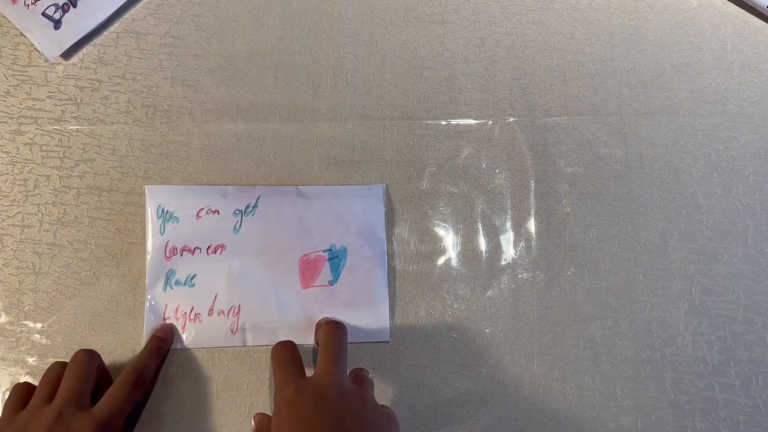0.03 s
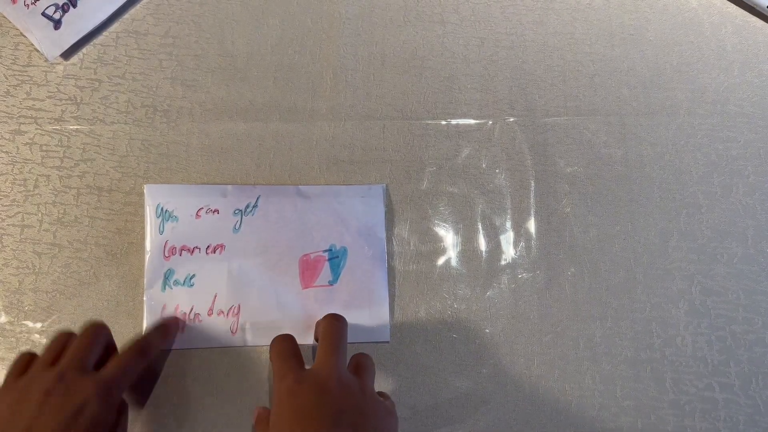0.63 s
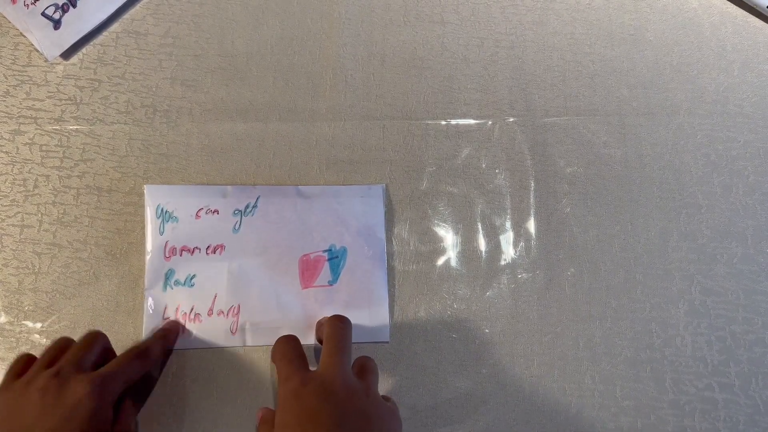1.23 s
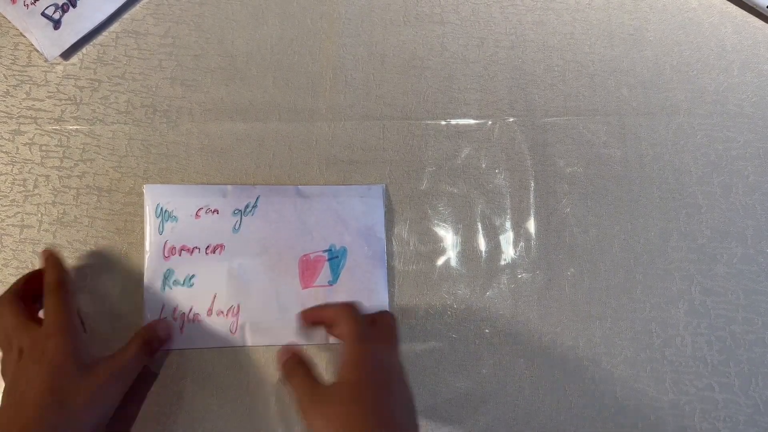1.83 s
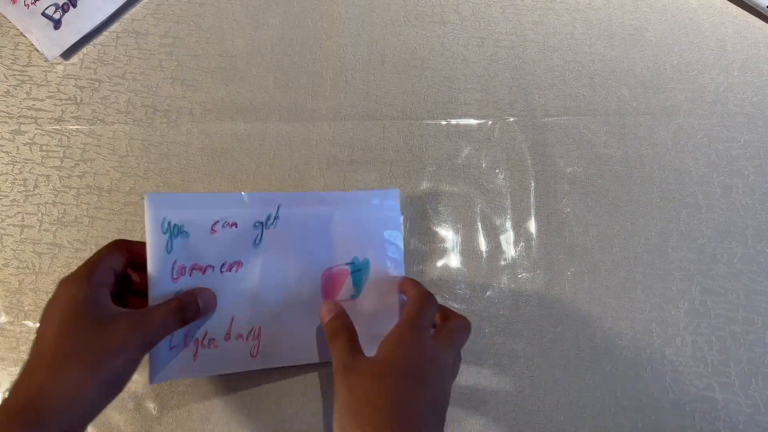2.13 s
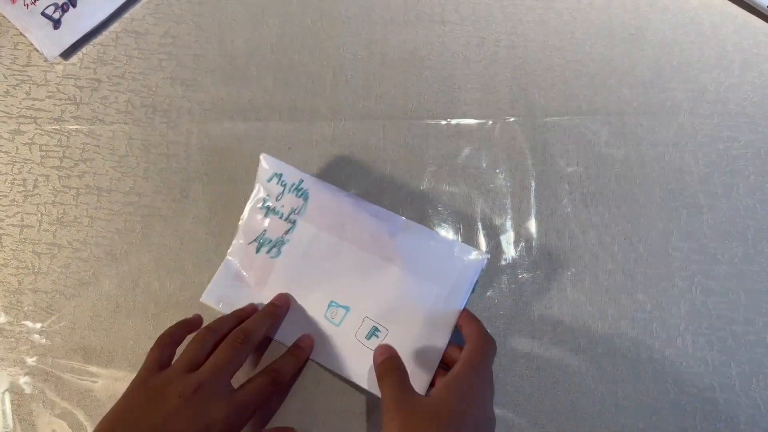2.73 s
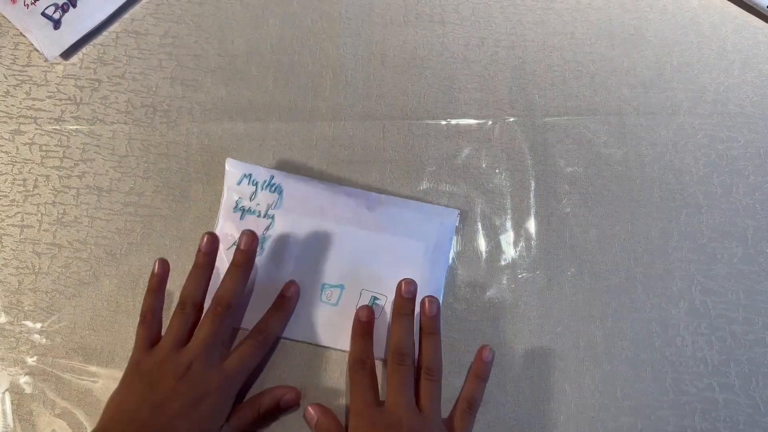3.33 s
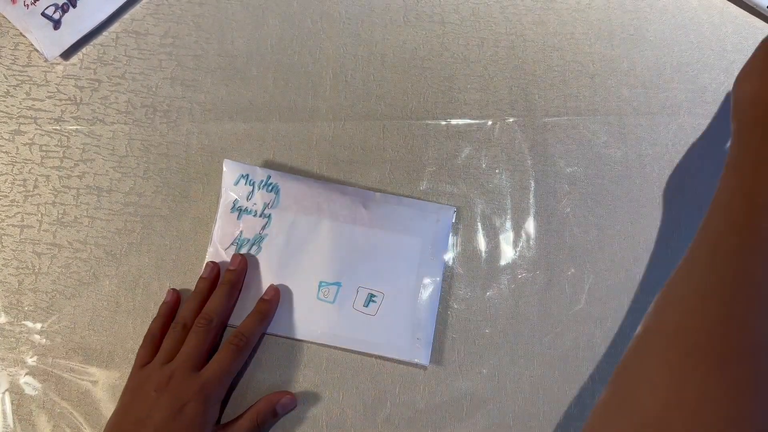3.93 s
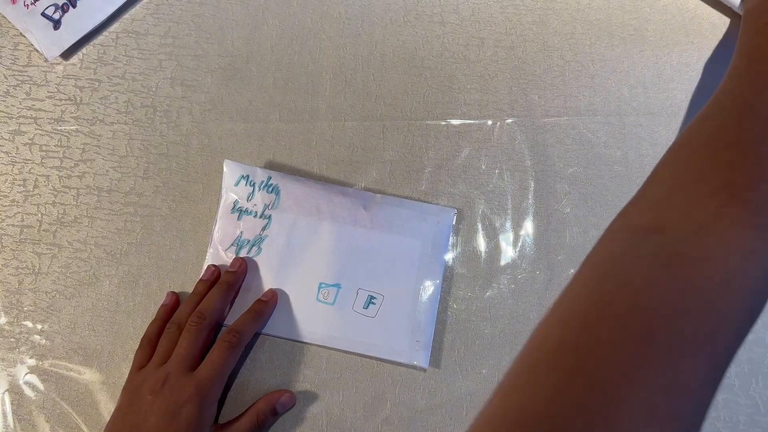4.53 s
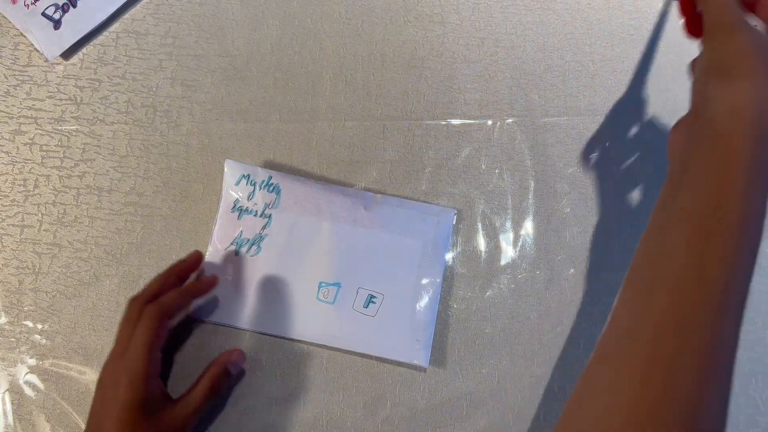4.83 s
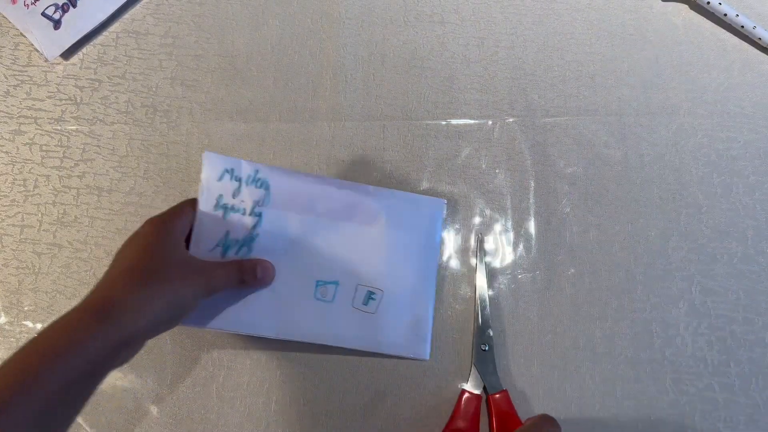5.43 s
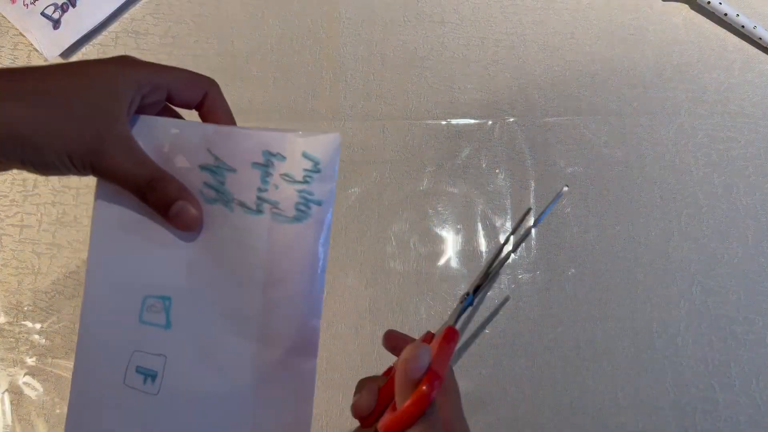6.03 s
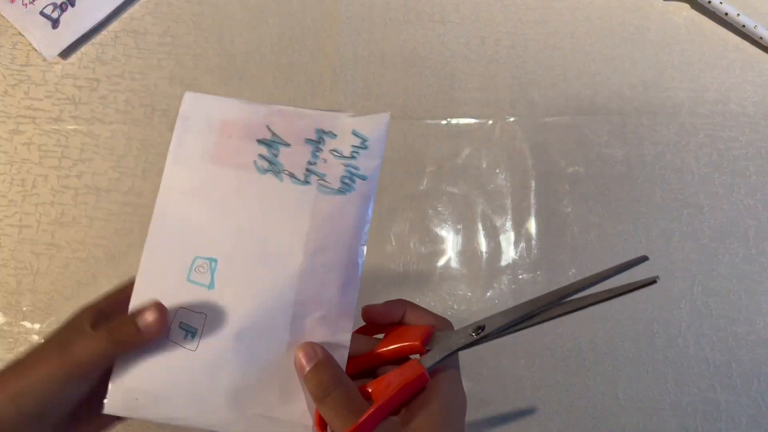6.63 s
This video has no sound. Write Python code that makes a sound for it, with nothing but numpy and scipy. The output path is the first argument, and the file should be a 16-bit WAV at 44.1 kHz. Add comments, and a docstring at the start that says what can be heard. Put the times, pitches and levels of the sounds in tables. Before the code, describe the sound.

Fingers tap a paper packet on a table, making crisp snaps and faint ticks. The packet rustles as it is flipped, then gets a few pats with dull thuds. An arm brushes past, and scissors click lightly as they are picked up, then clack down on the table. More crinkling follows. A close stereo microphone hears it in a small, quiet room with a faint low hum.

```python
"""At a table in a small, quiet room, fingers tap a taped paper packet, flip it and pat it, then fetch
scissors and set them down beside it. The paper snaps under impact and rustles under friction, and its
filling shifts. Blows send bending waves through the table top, an arm brushes past, and the steel
blades click, ring and rasp. A close stereo microphone on a stand hears it all over a low hum."""
import sys
import numpy as np
from scipy import signal
from scipy.fft import rfft, irfft, next_fast_len
from scipy.io import wavfile
from scipy.ndimage import map_coordinates

SR = 44100
rng = np.random.default_rng(int(sys.argv[2]) if len(sys.argv) > 2 else 0)


def pcm_store(signal):
    """Save signal as 16-bit PCM."""
    levels = np.round(np.clip(np.atleast_2d(signal), -1, 1) * 32767)
    wavfile.write(sys.argv[1], SR, levels.astype(np.int16).T)


N = 295029
TIME = np.arange(N) / SR
TOP_HZ = 16500

# Knocks of the scissors. Each row: start in seconds, level in dB, tilt in dB per octave, chatter in ms.
SCISSOR_KNOCKS = [(4.2648, -66, 11, 0.27), (4.2717, -60.5, 10, 0.36), (4.481, -51.5, 4, 0.96),
                  (4.5596, -50.5, 8.5, 0.44), (4.5673, -62, 5.5, 2), (4.7911, -44, 2.9, 0.78),
                  (4.8528, -53.5, -1.5, 1.5), (4.9132, -52, 0.5, 3), (4.9301, -43, 1.5, 0.82),
                  (5.2056, -58, 16, 0.55), (5.233, -39.5, 8, 0.83), (5.2718, -32, -2.5, 1.2),
                  (5.3051, -39.5, -4.5, 1.05), (5.326, -41.5, -3, 3.1), (6.0031, -50.5, 5, 5.5)]


def undb(db):
    """Amplitude grows tenfold every 20 decibels."""
    return 10 ** (np.asarray(db) / 20)


def unit(x):
    """Normalisation to an rms of 1."""
    return x / np.sqrt(np.mean(x ** 2))


def blow(x, db):
    """Energy scaling: a short sound has this level when its energy is spread over 10 ms."""
    return x * undb(db) * np.sqrt(SR / 100 / np.sum(x ** 2))


def add(track, s, x):
    """Superposition: a short sound joins the track at s seconds."""
    start = max(int(s * SR), 0)
    track[start:start + len(x)] += x[:N - start]


def colour(x, points):
    """Zero-phase filtering by a curve through points of frequency in Hz and gain in dB."""
    hz, db = np.transpose(points)
    size = next_fast_len(N + 2048, True)
    f = np.maximum(np.fft.rfftfreq(size, 1 / SR), 1)
    gain = undb(np.interp(np.log(f), np.log(hz), db))
    return irfft(rfft(x, size) * gain, size)[..., :N]


def walk(rate):
    """Random modulation: a line through Gaussian values drawn at this rate per second."""
    knots = rng.standard_normal(int(N / SR * rate) + 2)
    return np.interp(TIME * rate, np.arange(len(knots)), knots)


def swells(rows, attack_s, release_s, rest_db):
    """Incoherent sounds add in power: each movement rises, holds and decays to a resting level."""
    t, power = TIME[::32], undb(rest_db) ** 2
    for start, length, db in rows:
        fade = np.maximum(start - t, 0) / attack_s + np.maximum(t - start - length, 0) / release_s
        power = power + (undb(db) * np.exp(-fade)) ** 2
    return np.interp(TIME, t, np.sqrt(power))


def ring(modes, t, scatter_db=3):
    """Free vibration is a sum of damped modes, weighted differently by each point of contact."""
    return sum(undb(db + scatter_db * rng.standard_normal() - 60 * t / t60) * np.sin(2 * np.pi * hz * t)
               for hz, db, t60 in modes)


def spread(first, second, shared_hz=550):
    """Coherence falls with frequency: two noises become a stereo pair that shares its bass."""
    f = np.fft.rfftfreq(len(first), 1 / SR)
    apart = f ** 2 / (f ** 2 + shared_hz ** 2)
    mid, side = rfft(first) * np.sqrt(1 - apart / 2), rfft(second) * np.sqrt(apart / 2)
    return irfft(np.array([mid + side, mid - side]), len(first))


def place(x, lag_ms):
    """Path difference: the sound reaches the right microphone port after the left."""
    return np.array([x, map_coordinates(x, [(TIME - lag_ms / 1000) * SR], order=5)])


def lean(pair, left_db):
    """Level difference: the left channel gains this many decibels on the right."""
    return pair * undb([[left_db / 2], [-left_db / 2]])


def background(level_db=-59):
    """A diffuse field of faint, steady noise fills the room."""
    # Each row: frequency in Hz, spectral level in dB.
    spectrum = [(15, -35.5), (25, 0.5), (70, 8.5), (317, -21.5), (936, -13.5), (2350, -17), (3720, -27),
                (4870, -27), (8140, -29), (10400, -41.5), (11600, -55.5), (14000, -82.5), (16000, -57.5)]
    return undb(level_db) * unit(colour(spread(*rng.standard_normal((2, N))), spectrum))


def hum(hz=46.5, waver=0.019, stop_s=2.5, release_s=.13):
    """A low tone, randomly modulated in frequency and amplitude, ends in an exponential decay."""
    # Each row: time in seconds, relative level in dB.
    contour = [(0.0, -63), (0.14, -51.5), (0.58, -69), (0.65, -61), (1.32, -53.5), (1.83, -61), (1.98, -49),
               (2.2, -63)]
    pitch = hz * (1 + waver * walk(3.2))
    tone = unit(np.sin(2 * np.pi * np.cumsum(pitch) / SR))
    level_db = np.interp(TIME, *np.transpose(contour)) + 5 - 2 * walk(12)
    return tone * undb(level_db) * np.exp(-np.maximum(TIME - stop_s, 0) / release_s)


def rustle(grains_per_s=900, friction_db=-3, flutter_db=8):
    """Stick-slip friction: paper fibres catch and let go in uneven grains over a soft hiss."""
    # Strokes of the fingers. Each row: start in seconds, length in seconds, level in dB.
    strokes = [(.01, 0.055, -48), (1.42, 0.083, -66), (1.835, 0.014, -56.5), (2.02, 0.21, -58),
               (2.22, 0.014, -48), (2.39, 0.17, -51), (2.8, 0.088, -60), (3.14, 0.063, -49),
               (3.385, 0.0047, -54), (4.57, 0.02, -60), (4.81, 0.013, -52), (5.19, 0.09, -47.5),
               (5.31, 0.011, -45.5), (5.45, 0.095, -48), (5.62, 0.2, -66), (6.02, 0.072, -57.5),
               (6.3, 0.033, -55.5), (6.67, .02, -59)]
    # Each row: frequency in Hz, spectral level in dB.
    spectrum = [(100, -12), (300, -1.5), (900, -0.5), (1900, -1.5), (3200, 6), (5000, 0), (8000, -11),
                (12000, -12), (16000, -5)]
    grains = (rng.random(N) < grains_per_s / SR) * rng.standard_normal(N)
    slide = unit(grains) + undb(friction_db) * rng.standard_normal(N)
    envelope = swells(strokes, attack_s=0.018, release_s=0.065, rest_db=-78)
    return unit(colour(slide, spectrum)) * envelope * undb(flutter_db * walk(51))


def voice(push, db, tilt_db, resonance_hz, resonance_db=2, resonance_octaves=0.6):
    """Minimum-phase filtering colours a snap: brighter for a sharper contact, with a broad resonance."""
    # The body, mid, edge and air ranges. Each row: lower limit in Hz, upper limit in Hz.
    ranges = [(350, 1200), (1200, 3200), (3200, 7500), (7500, 16000)]
    # The spectrum common to all snaps. Each entry: relative level of one range in dB.
    shape_db = [-6.5, 0.05, -2.5, -13]
    f, spectrum = np.fft.rfftfreq(len(push), 1 / SR), rfft(push)
    centres = np.log(np.prod(ranges, axis=1)) / 2
    levels = db + np.array(shape_db) + tilt_db * (centres - np.median(centres)) / np.log(2)
    gain = f ** 2 / (f ** 2 + ranges[0][0] ** 2) + 1e-3
    for _ in range(3):  # each pass brings the ranges closer to their levels
        power = np.abs(spectrum * gain) ** 2 * 200 / (SR * len(push))
        amplitudes = [np.sqrt(power[(f >= lo) & (f < hi)].sum()) for lo, hi in ranges]
        gain *= np.exp(np.interp(np.log(f + 1), centres, np.log(undb(levels) / amplitudes)))
    gain *= undb(resonance_db * np.exp(-(np.log2((f + 1) / resonance_hz) / resonance_octaves) ** 2))
    log_gain = np.log(np.concatenate([gain, gain[-2:0:-1]]))
    return irfft(spectrum * np.exp(np.conj(signal.hilbert(log_gain)))[:len(f)])


def snaps(rows, crackle, rise, settle_db, sweep_s, settle_s=.013, lead_s=.015):
    """Impulsive excitation: a sharp snap in a swarm of tiny ones, then a settling crackle."""
    direct, radiated = np.zeros((2, N))
    t = (np.arange(2560) - int(lead_s * SR)) / SR
    f = np.fft.rfftfreq(len(t), 1 / SR)
    # A thin sheet is dispersive: the treble arrives first.
    snap = irfft(rfft(1. * (t == 0)) * np.exp(1j * np.pi * sweep_s * f ** 2 / TOP_HZ))
    settling = (t > 0) * np.exp(-np.abs(t) / settle_s)
    for s, db, tilt_db, length_ms, hz in rows:
        length_s = length_ms / 1000
        swell = np.exp(-np.abs(t) / np.where(t < 0, rise * length_s, length_s))
        grains = rng.standard_normal((2, len(t))) * rng.rayleigh(size=(2, len(t)))
        swarm, settle = grains * [swell, settling]
        push = unit(unit(snap) + crackle * length_ms * unit(swarm)) + undb(settle_db) * unit(settle)
        add(direct, s - lead_s, voice(push, db, tilt_db, hz))
        # Summed over all directions a snap has a smooth spectrum: this is what fills the room.
        add(radiated, s, voice(signal.unit_impulse(1024), db, tilt_db, hz))
    return direct, radiated


def packet_snaps(flip_s=2.3, front_hz=4000, back_hz=1810, ticks_per_s=4):
    """Tension raises resonance: the packet's taut front cracks high, its slack back sounds hollow."""
    # Taps and creases, with one bright early echo just after the first tap.
    # Each row: start in seconds, level in dB, tilt in dB per octave, crackle in ms.
    cracks = [(0.0136, -24, 2.5, 1.5), (0.0209, -39.5, 9, 1), (.399, -60.5, 1.5, 1.4),
              (0.438, -49.5, 0.5, 1.3), (0.6513, -35.5, 0, 2.3), (0.6592, -48, -2, 2.5),
              (0.7548, -49.5, -1, .9), (0.867, -48, -1.4, 1.1), (0.9474, -53, -3.5, 2.4),
              (1.038, -50.5, -2.5, .6), (1.1308, -55.5, -3.5, .8), (1.2395, -51, 1, 0.61),
              (1.2457, -26.5, 3, 0.39), (1.3597, -49.5, -0.4, 1.3), (1.4332, -48.5, -1, 3.3),
              (1.5324, -47.5, -0.5, 0.78), (1.6147, -43, -1.6, 3.2), (1.7445, -45.5, 1, 0.38),
              (1.7963, -53.5, 7.5, 0.3), (1.961, -43, 2.4, 1.2), (2.0055, -37.5, 0, 6.7),
              (2.0234, -33, -1, 0.48), (2.0815, -56, -7.5, 0.79), (2.1456, -70, 12, 1.4),
              (2.2877, -57, -3.5, 2), (2.3384, -33.5, 1.3, 6.8), (2.348, -42.5, -7, 6.1),
              (2.4455, -43.5, 1.5, .7), (2.4669, -50.5, -6, 1.2), (2.5471, -31.5, 2, 1.16),
              (2.5553, -39, -3, 2.2), (2.804, -53.5, -3, 3.6), (2.8702, -40.5, 1, 2.1),
              (2.9874, -30, -0.9, 4.4), (2.991, -31, -0.5, 1.6), (3.1301, -32, -1.5, 5.9),
              (3.1959, -32.5, 1.5, 5.9), (3.2023, -27, 1.45, 2.1), (3.4023, -31, -0.5, 2.6),
              (3.517, -54.5, -4.5, 3), (5.118, -57, 5.5, 0.73), (5.1606, -35, -1, 2.6),
              (5.1674, -42, -1.5, 2.2), (5.4699, -37.5, -.9, 1.4), (5.519, -47.5, 1, 3.9),
              (5.5422, -37.5, 0, .7), (5.7247, -52, -3.5, 3.2), (5.7793, -41.5, -0.5, 1),
              (5.8786, -51.5, -2.5, 0.7), (6.2403, -47, -0.5, 0.75), (6.2954, -36.5, 1, 1.3),
              (6.3002, -49.5, -9, 14), (6.5228, -51.5, -6, 2)]
    # Spans in which the held packet ticks faintly. Each row: start and end in seconds.
    held = [(.35, 2.2), (2.05, 2.7), (5.45, 6.3)]
    # Each row: frequency in Hz, gain of the packet in dB.
    response = [(400, -3), (1000, -0.5), (1450, -3.5), (1900, -0.5), (2500, 2.5), (3200, 4), (4300, 6),
                (5600, 1.5), (7000, 0), (8300, 3.5), (12000, 8.5)]
    ticks = [(rng.uniform(start, end), rng.normal(-60.5, 2.5), -4, 1.1)  # columns as in cracks
             for start, end in held for _ in range(int(ticks_per_s * (end - start)))]
    rows = [(s, *snap, front_hz if s < flip_s else back_hz) for s, *snap in cracks + ticks]
    direct, radiated = snaps(rows, crackle=1, rise=0.45, settle_db=-9.5, sweep_s=.0012)
    return colour(direct, response), colour(radiated, response)


def table_top(travel_s=0.004916, band_ratio=1.374, shudder_s=0.0087, thump_hz=148.7, thump_lag_s=0.001):
    """Bending waves run faster at high pitch: a thud chirps down, shudders between the edges and rings."""
    # Each row: start in seconds, knock in dB, centre in Hz (lower for softer contact), thump in dB.
    thuds = [(.028, -26.5, 520, -36), (0.662, -39.5, 540, -37.5), (1.247, -70, 400, -55),
             (1.833, -42.5, 420, -53), (1.846, -35.5, 290, -45.5), (1.966, -43, 300, -50),
             (2.337, -37.5, 407, -52), (2.555, -47, 300, -60), (2.99, -61, 397, -51),
             (3.201, -39.5, 545, -43.5), (3.405, -48, 430, -40.5), (4.236, -53, 300, -58.5),
             (4.329, -43, 310, -60), (4.355, -38.5, 326, -64), (4.481, -50.5, 300, -61.5),
             (4.528, -46.5, 210, -49.5), (4.636, -49.5, 368, -58), (4.792, -51, 207, -59),
             (5.179, -44.5, 222, -56), (5.271, -25, 267, -33), (5.275, -26.5, 1000, -56),
             (5.303, -31.5, 314, -44), (6.007, -47, 534, -61), (6.243, -47, 590, -58),
             (6.303, -39.5, 487, -50), (6.51, -41.5, 624, -66)]
    # Each row: frequency in Hz, level in dB, time to decay by 60 dB in seconds.
    modes = [(90, -2, .17), (145, 0, .17), (189, -2, .17), (248, -2, .17), (282, -5, .16), (339, 0, .2),
             (433, -1, .17), (651, -7, .14), (841, -6, .14), (998, 1, .16), (1311, -6, .16),
             (1616, -3, .16), (1863, -4, .15)]
    track, t = np.zeros(N), np.arange(8192) / SR
    f = np.fft.rfftfreq(len(t), 1 / SR)
    wave = irfft(np.exp(-4j * np.pi * travel_s * np.sqrt(200 * f)), len(t))  # travel_s holds at 200 Hz
    knocks = [(s, db, hz) for s, db, hz, _ in thuds]
    # The weight of the hand follows the first contact.
    thumps = [(s + thump_lag_s, db, thump_hz) for s, _, _, db in thuds]
    for s, db, hz in knocks + thumps:
        load = rng.uniform(.988, 1.012)  # resting hands shift the modes a little
        band = signal.butter(2, [hz / band_ratio, hz * band_ratio], "band", fs=SR, output="sos")
        contact = signal.sosfilt(band, wave)
        shudder = signal.sosfilt(band, rng.standard_normal(len(t)) * np.exp(-t / shudder_s))
        body = signal.sosfilt(band, ring(modes, t * load))
        add(track, s, blow(blow(contact, db=0) + blow(shudder, db=-6) + blow(body, db=-4), db))
    return track


def filling(flutter_db=3):
    """Amplitude-modulated noise: the filling shifts inside the packet in soft, dull lurches."""
    # Each row: start in seconds, length in seconds, level in dB.
    lurches = [(1.92, 0.71, -62), (2.5, 0.019, -56), (3.1, 0.22, -64.5), (4.37, .04, -58.5),
               (5.3, .03, -47), (5.78, 0.037, -57.5), (6.28, 0.63, -64.5)]
    # Each row: frequency in Hz, spectral level in dB.
    spectrum = [(40, -14), (140, 0.5), (300, 3), (600, -3), (1100, -1), (2500, -35.5), (8000, -47.5)]
    envelope = swells(lurches, attack_s=0.035, release_s=.075, rest_db=-72)
    return unit(colour(rng.standard_normal(N), spectrum)) * envelope * undb(flutter_db * walk(40))


def stand_sway(rise_s=0.0032, decay_s=0.035):
    """The stand is a damped oscillator that sways briefly when the table is nudged."""
    # Each row: start in seconds, level in dB, frequency in Hz.
    nudges = [(2.551, -44, 56.5), (2.998, -37, 53), (3.209, -61.5, 62), (3.417, -36, 54.5),
              (5.69, -41.5, 48.4), (6.401, -30.5, 43.8), (6.52, -39, 46.2)]
    track, t = np.zeros(N), np.arange(SR // 2) / SR
    envelope = np.exp(-t / decay_s) * (1 - np.exp(-t / rise_s))
    for s, db, hz in nudges:
        add(track, s, blow(np.sin(2 * np.pi * hz * t) * envelope, db))
    return track


def arm(flutter_db=1):
    """Sliding friction gives a smooth, high hiss as the arm reaches across the table."""
    # Each row: start in seconds, length in seconds, level in dB.
    reach = [(3.59, 0.15, -56)]
    # Each row: frequency in Hz, spectral level in dB.
    spectrum = [(180, -56.5), (300, -10), (370, -4), (407, -18), (448, -5), (738, -7.5), (955, -5.5),
                (3810, -7.5), (6680, -3), (8370, -20), (14000, -32)]
    envelope = swells(reach, attack_s=.035, release_s=0.14, rest_db=-76)
    return unit(colour(rng.standard_normal(N), spectrum)) * envelope * undb(flutter_db * walk(17))


def scissor_clicks(resonance_hz=4570):
    """Brief, hard impacts have broad spectra: the scissors click and chatter."""
    knocks = [(*knock, resonance_hz) for knock in SCISSOR_KNOCKS]
    return snaps(knocks, crackle=0.6, rise=0.26, settle_db=-7, sweep_s=0.001025)


def blades(knock_ring_db=-16, drag_ring_db=-3.5):
    """Impact and friction excite the hand-damped blades, whose modes shift with their opening."""
    # Each row: frequency in Hz, level in dB, time to decay by 60 dB in seconds.
    modes = [(2100, -9.5, .14), (3180, 10.5, 0.05), (3540, 4, 0.11), (3870, -14.5, .14), (4780, -13.5, 0.2),
             (4970, 0.5, .15), (6800, -10.5, 0.13)]
    # Drags over the table cover. Each row: start and length in seconds, level in dB, pitch ratio.
    drags = [(4.552, 0.028, -58, 1.7), (4.911, 0.021, -48.5, 1.01), (6.008, 0.019, -51, 0.75)]
    # Each row: frequency in Hz, spectral level in dB.
    rasp_spectrum = [(600, -20), (1900, -27.5), (2600, 4), (2950, 6.5), (3300, 0), (3900, 0.5), (4600, 6.5),
                     (5200, 1), (6200, -11.5), (9000, -27), (15000, -35.5)]
    track, t = np.zeros(N), np.arange(SR // 4) / SR
    for s, db, *_ in SCISSOR_KNOCKS:
        pitch_ratio = rng.uniform(.92, 1.08)
        add(track, s, blow(ring(modes, t * pitch_ratio), db + knock_ring_db))
    rasp = unit(colour(rng.standard_normal(N) * rng.exponential(size=N), rasp_spectrum))
    for *drag, pitch_ratio in drags:
        slips = rasp * swells([drag], attack_s=0.0033, release_s=0.042, rest_db=-90)
        steel = signal.oaconvolve(slips, ring(modes, t * pitch_ratio))[:N]
        track += slips + undb(drag_ring_db) * np.std(slips) * unit(steel)
    return track


def room(x, build_s=0.00057, echo_s=.0068, echo_db=-17):
    """Reverberation: one near reflection and a diffuse tail that loses its treble first."""
    # Each row: frequency in Hz, reverberation time in seconds, reverberant level in dB.
    bands = [(98, 0.2, 13), (300, 0.45, -11), (820, 0.35, -3), (2020, 0.34, -6), (4170, 0.31, -13),
             (8600, 0.28, -1), (13500, 0.1, -40)]
    hz, t60, db = np.transpose(bands)
    t = np.arange(SR * 3 // 4) / SR
    log_f = np.log(np.maximum(np.fft.rfftfreq(len(t), 1 / SR), 1))
    noise, tail = rfft(spread(*rng.standard_normal((2, len(t))))), 0
    for share, seconds, gain in zip(np.eye(len(hz)), t60, undb(db)):
        band_noise = irfft(noise * np.interp(log_f, np.log(hz), share), len(t))
        fade = undb(-60 * t / seconds) * (1 - np.exp(-t / build_s))
        tail = tail + gain * band_noise * fade / np.linalg.norm(fade)
    tail[:, int(echo_s * SR)] += undb(echo_db)
    return signal.fftconvolve(x[None], tail, axes=1)[:, :N]


def scene():
    """Direct and reverberant sound add; delays put the packet to the left, the scissors near centre."""
    packet, packet_radiated = packet_snaps()
    clicks, clicks_radiated = scissor_clicks()
    paper, steel, sleeve, thuds = rustle(), blades(), arm(), table_top() + filling()
    direct = place(packet + paper, lag_ms=.15) + place(clicks + steel, lag_ms=0.013)
    direct += lean(place(thuds, lag_ms=0.28), left_db=-1)
    direct += lean(place(sleeve, lag_ms=.42), left_db=7.5)
    echoes = room(packet_radiated + clicks_radiated + paper + steel + sleeve + thuds)
    quiet = lean(background(), left_db=3.5)
    rumble = lean(place(hum() + stand_sway(), lag_ms=.6), left_db=-1.5)
    return direct + lean(echoes, left_db=0.5) + quiet + rumble


def record(dry):
    """Frequency response: each microphone port ripples the spectrum its own way, and the top is cut."""
    # Each row: frequency in Hz, gain of the left port over the right in dB.
    balance = [(200, 2), (500, 3), (1000, 3.5), (2000, -2), (4000, 3.5), (8000, 1), (12000, -2)]
    # Each row: frequency in Hz, gain of both ports in dB.
    response = [(20, -21), (40, -4), (3000, -0.5), (8300, -1.5), (9400, -5), (10300, -12), (11700, 1.5),
                (13700, -26.5), (15200, -4), (16500, -24)]
    ports = [colour(x, np.array(balance) * [1, side / 2]) for x, side in zip(dry, (1, -1))]
    low_pass = signal.ellip(8, .2, 70, TOP_HZ, fs=SR, output="sos")
    return signal.sosfilt(low_pass, colour(np.array(ports), response))


dry = scene()
out = record(dry)
pcm_store(out)
```